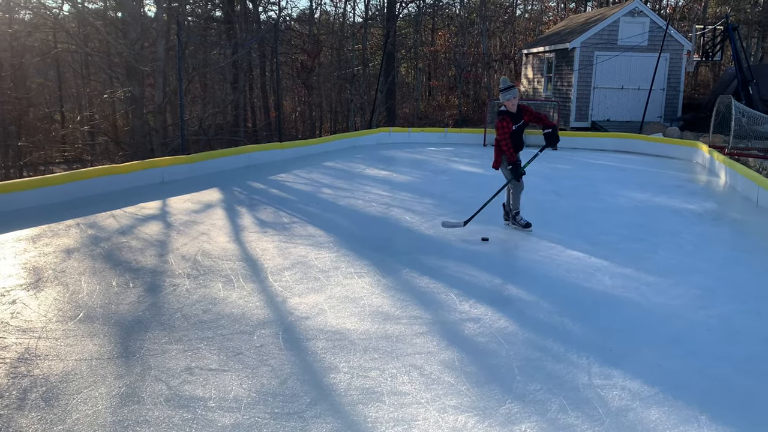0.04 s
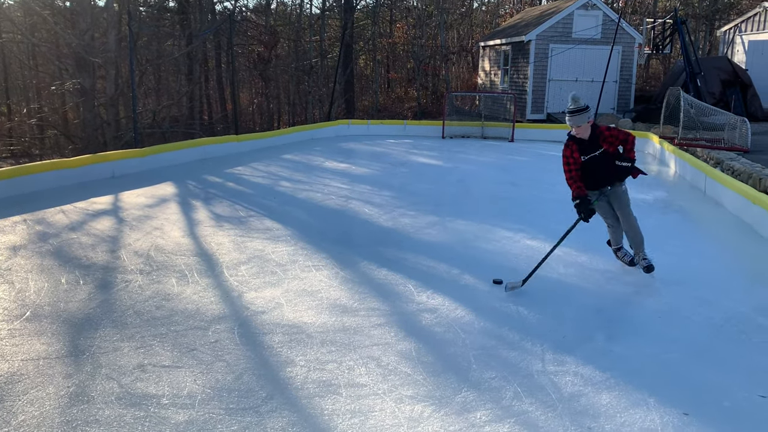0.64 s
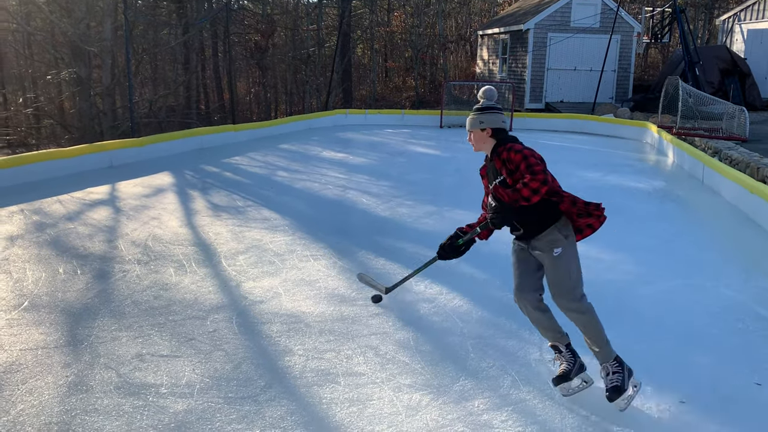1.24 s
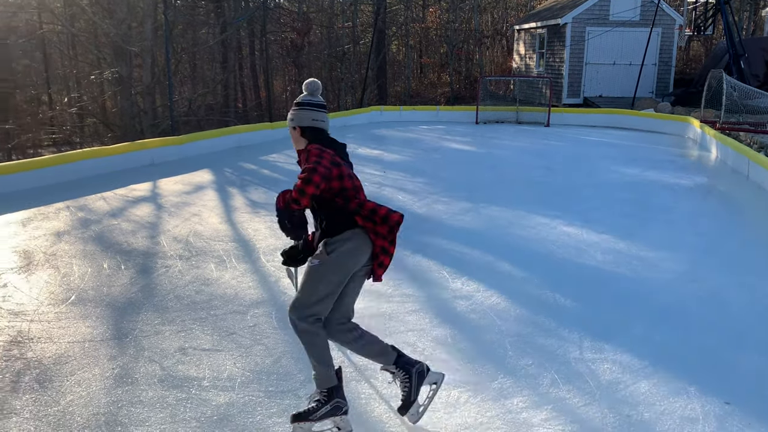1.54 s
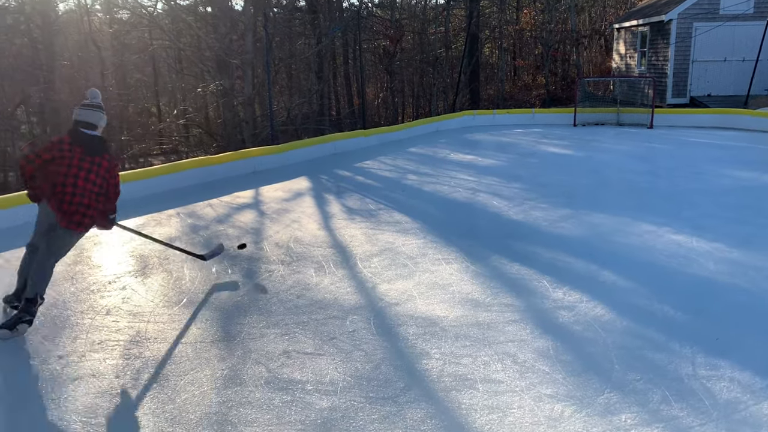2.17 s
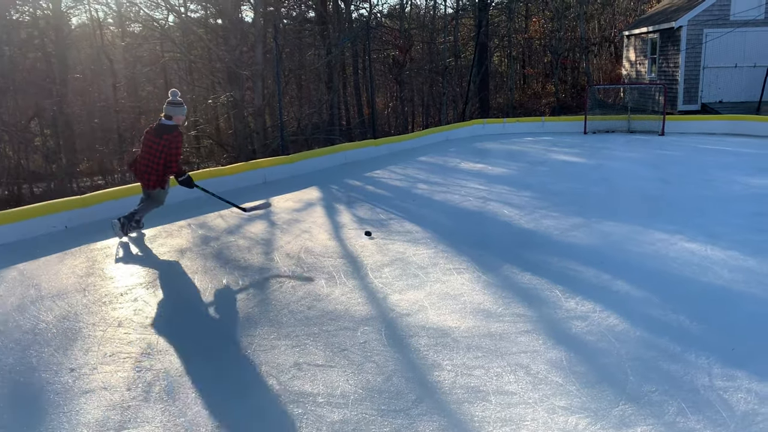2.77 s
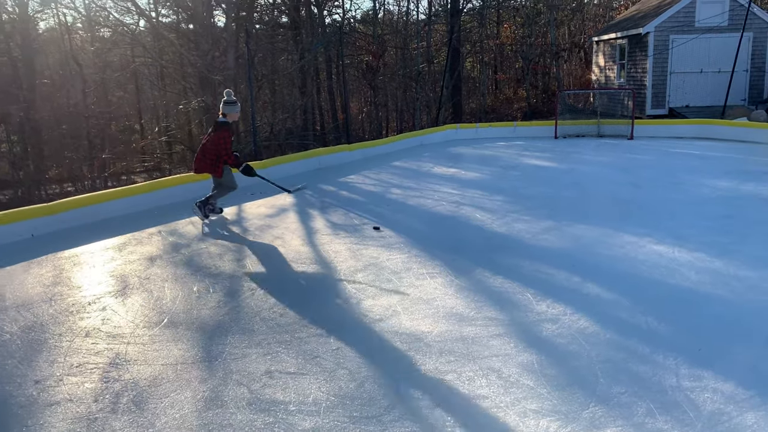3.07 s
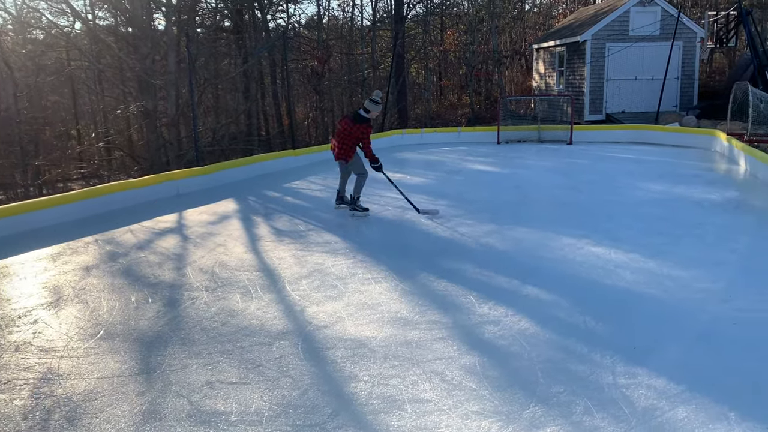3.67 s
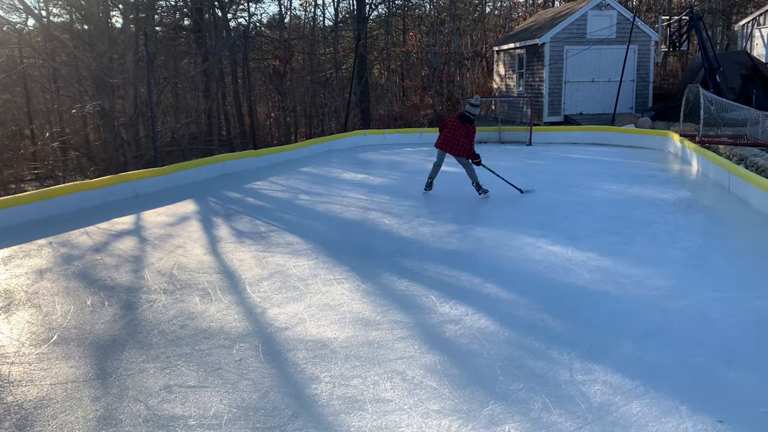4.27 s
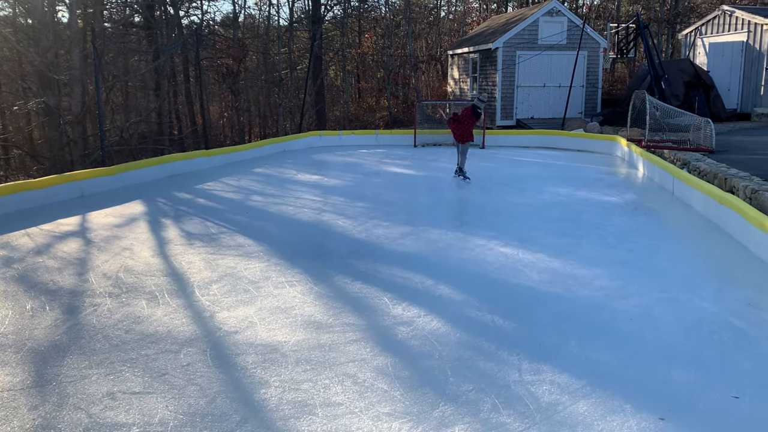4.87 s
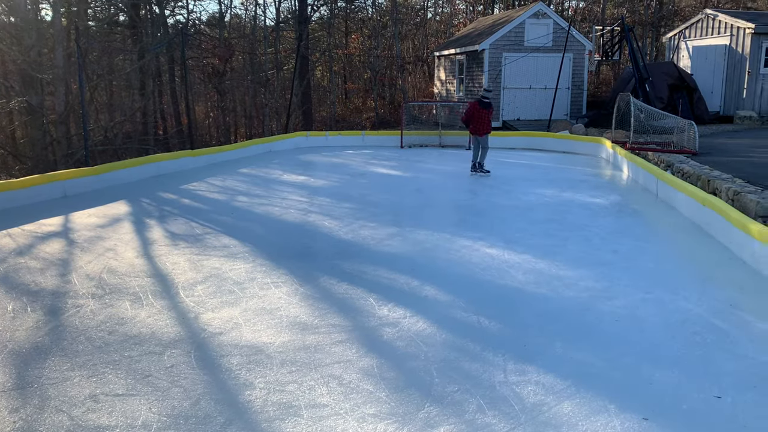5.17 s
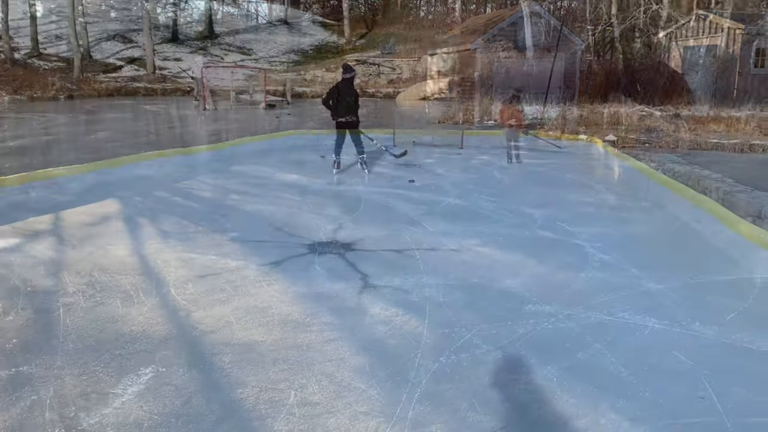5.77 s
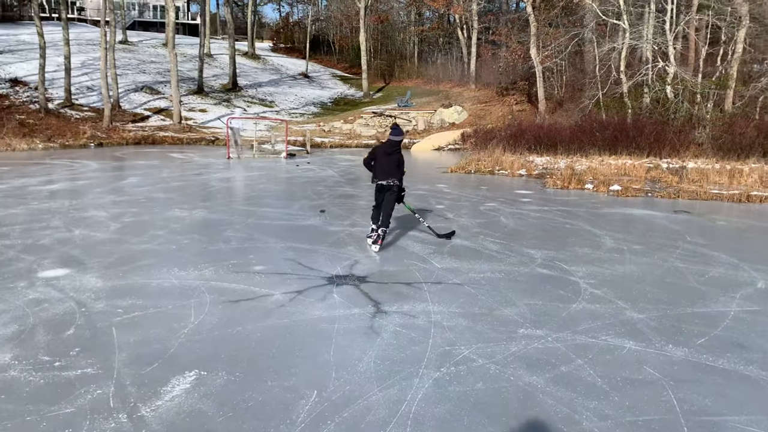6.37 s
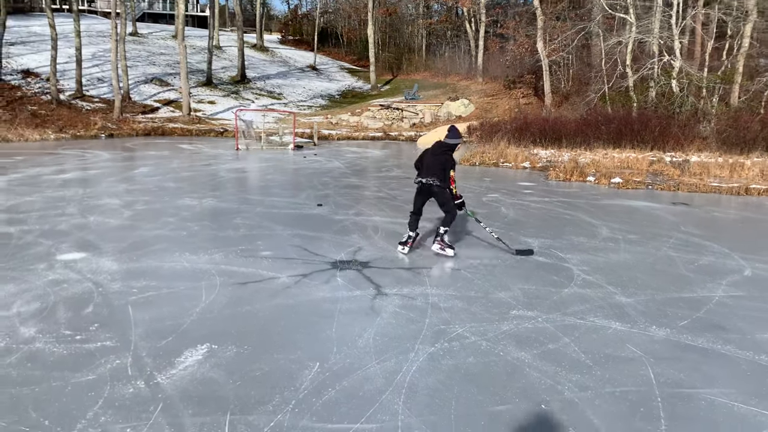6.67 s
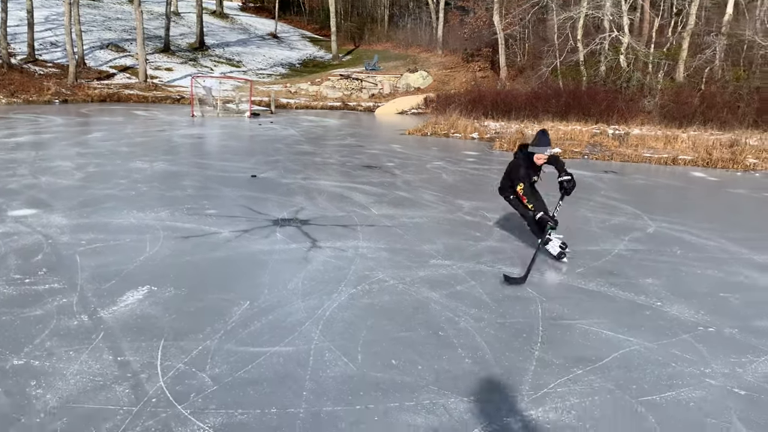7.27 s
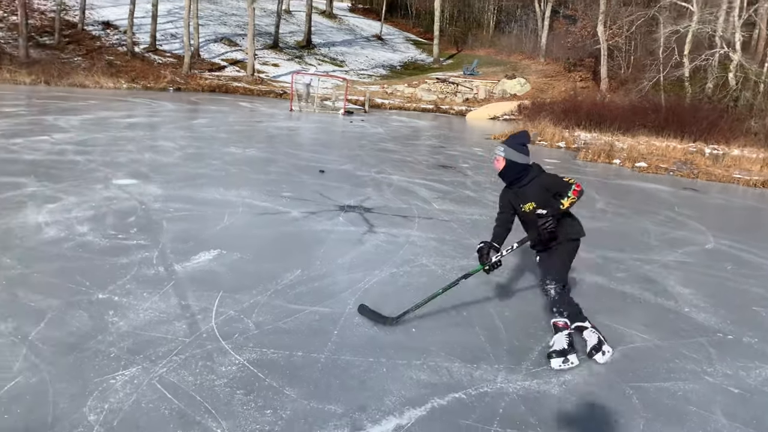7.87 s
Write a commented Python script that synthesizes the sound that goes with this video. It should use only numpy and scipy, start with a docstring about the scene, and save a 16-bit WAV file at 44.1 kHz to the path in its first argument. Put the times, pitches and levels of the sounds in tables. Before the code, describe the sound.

Ice skates scrape and carve outdoors while a hockey stick clacks on the puck and one shot booms off the boards.

```python
"""A stick clacks on puck and ice as a skater crosses a backyard rink, sweeps a shot and booms it off
the boards; then a skater glides on a frozen pond, whose ice chirps when knocked. Impacts excite the
damped modes of the stick blade and the boards. Sliding friction makes the steel edges grind and hiss
over rumbling ice. Boards and woods reflect the strikes back to a pair of small microphones."""
import sys
import numpy as np
from scipy import signal
from scipy.fft import rfft, irfft, next_fast_len
from scipy.io import wavfile

SR = 44100
rng = np.random.default_rng(int(sys.argv[2]) if len(sys.argv) > 2 else 0)


def put_to_file(sound):
    """Save the sound as 16-bit audio at rate SR, in the file named by the first command-line argument."""
    columns = np.atleast_2d(sound).T  # one column per channel
    safe = np.clip(columns, -1, 1)
    whole_steps = np.round(safe * 32767)
    wavfile.write(sys.argv[1], SR, whole_steps.astype(np.int16))


N = 354323
TIME = np.arange(N) / SR
FRICTION_ATTACK_S = 0.0044
# normal modes of the stick blade: f/Hz, level/dB
BLADE_MODES = [(520, -4), (670, -2), (840, -1.5), (1130, -2), (1300, 0.5), (1830, 1.5), (2160, -6.5),
               (2385, -3.5), (2880, -4.5), (3400, -3.5), (4100, 0)]
# spectrum of sprayed snow: f/Hz, level/dB
SNOW_SPECTRUM = [(1500, -6.5), (3900, -1.5), (5600, -6.5), (7400, -2.5), (8500, 1), (11500, -4.5),
                 (16000, -10.5)]


def clacks():
    """Impact excitation: each strike is three ever weaker contacts that rattle and ring the blade."""
    # stick, puck and skate strikes: t/s, knock level/dB, thump/dB re knock, crack/dB re knock,
    # favoured ring f/Hz
    strikes = [(0.23, -30, -13, -7, 1275), (0.257, -21.5, 0.5, -11, 509.2),
               (0.667, -17.5, -16.5, -17, 1330), (0.7245, -12, -8.5, -6.5, 1930),
               (1.117, -25, -2.5, -0.5, 1320), (1.135, -15.5, -4, -8.5, 1170), (1.38, -14, -8, -13, 1260),
               (1.39, -22.5, -4.5, -6, 1350), (1.81, -20.5, -1.5, -7, 680), (1.866, -30.5, -12, -1, 2340),
               (2.059, -15, -15.5, -5, 1550), (3.432, -23.5, -13.5, -6, 1460),
               (3.4917, -13, -7.5, -6.5, 1470), (4.04, -27.5, -12.5, -7, 1260),
               (4.083, -27, 3.5, -3.5, 485), (4.3167, -16, -17.5, -3.5, 2430), (4.765, -15.5, -1, -5, 1070),
               (5.153, -16.5, -0.5, 3, 1190), (5.161, -15.5, -10, -1, 1180), (6.414, -20, 6.5, -2.5, 664),
               (6.687, -30, -5, -9, 1090), (6.707, -24, -8.5, -5.5, 1590), (6.798, -33.5, 3.5, -1.5, 1570),
               (6.9126, -16.5, -7.5, -12, 1900), (6.919, -21.5, -4.5, -9, 1250),
               (6.971, -24.5, -0.5, -12.5, 706)]
    bounce_s, bounce_db, ring_db = 0.0023, -5, 1
    out, t = np.zeros((2, N)), np.arange(7000) / SR
    attack = t < 0.008
    for s, knock_db, thump_db, crack_db, ring_hz in strikes:
        chatter = amp(-22 + 6.4 * wander(per_s=386)[:len(t)]) * np.exp(-t / 0.015)
        contact = noise(len(t)) * (np.exp(-t / 0.00079) + chatter)
        lag = round(bounce_s * np.exp(0.15 * rng.standard_normal()) * SR)
        hit = 0
        for k in range(3):
            touch = unit(contact) + amp(ring_db) * unit(blade_ring(t, ring_hz, focus_db=10))
            hit = hit + amp(bounce_db * k) * np.roll(touch, k * lag, axis=1)
        # soft rubber gives the thump; the harder and nearer the crack, the more tick above it
        far = 3 < s < 4.5
        tick_db = 1.56 * crack_db - 10 * far
        parts = [(band(hit, 144, 702), thump_db), (band(hit, 1054, 2630), 0),
                 (band(hit, 2950, 6180), crack_db), (band(hit, 5500, 14200), tick_db)]
        clack = sum(amp(knock_db + db) * part / part[:, attack].std() for part, db in parts)
        add(out, s, clack)
        if 3 < s < 5:  # out on the rink, the boards slap it back
            add(out, s + 0.0165, amp(-10.5) * clack[::-1])
    return out


def blade_ring(t, ring_hz, focus_db, t60_s=0.018):
    """Free vibration: paired modes shift with the grip; the contact point favours those near ring_hz."""
    hz, db = np.transpose(BLADE_MODES + BLADE_MODES)[:, :, None]
    favoured = np.exp(-(np.log(hz / ring_hz) / 0.2) ** 2)
    hz = hz * (1 + 0.018 * rng.standard_normal(hz.shape))
    db = db + 3.5 * rng.standard_normal(hz.shape)
    envelopes = amp(db + focus_db * favoured - 60 * t / t60_s)
    return (envelopes * np.sin(2 * np.pi * (hz * t + rng.random(hz.shape)))).sum(0)


def shot_sweep(width_hz=450):
    """Friction drives a gliding resonance: the scraping blade's ring sinks as the shaft bends."""
    # the blade dragging the puck into the shot: t/s, level/dB, lowest ring f/Hz
    sweep = [(4.652, -48, 2800), (4.682, -24, 1650), (4.705, -27.5, 1140), (4.765, -28.5, 890),
             (4.85, -40.5, 830)]
    level_db, lowest_hz = controls(sweep)
    rub = scrape(chatter_db=3.0, chips_per_s=200, chip_db=2)
    # shift down by the ring frequency, low-pass, shift back: a moving band-pass
    carrier = np.exp(2j * np.pi * np.cumsum(lowest_hz) / SR)
    r = np.exp(-np.pi * width_hz / SR)
    sinking = (carrier * signal.lfilter([(1 - r) ** 2], [1, -2 * r, r * r], rub / carrier)).real
    modes = rubbed_blade(rub, lowest_hz, dull_db_per_octave=4.5)
    drag = amp(-5) * unit(sinking) + unit(modes) + amp(-6.5) * colour(rub, SNOW_SPECTRUM)
    return amp(level_db) * drag * (TIME > sweep[0][0]) * (TIME < sweep[-1][0])


def boards(impact_s=5.158):
    """Damped panel modes: the shot sets the boards booming, with a brief rattle."""
    # modes of the rink boards: f/Hz, level/dB, T60/s
    modes = [(135, -31, .25), (178, -29.5, 1.05), (229, -28.5, .3)]
    out, t = np.zeros((2, N)), np.arange(SR) / SR
    boom = sum(amp(db - 60 * t / t60) * np.sin(2 * np.pi * hz * t) for hz, db, t60 in modes)
    rattle = unit(band(noise(len(t)), 490, 4200, order=1)) * amp(-21 - 60 * t / 0.31)
    add(out, impact_s, (boom + rattle) * (1 - np.exp(-t / 0.0026)))
    return out


def ice_chirps(top_hz=2380, travel_s=0.0055, decay_s=0.0083):
    """Dispersion: short bending waves outrun long ones in ice, so a knock arrives as a falling chirp."""
    # knocks on the pond's ice sheet: t/s, level/dB
    knocks = [(6.799, -18), (6.814, -27), (6.901, -20), (7.213, -19)]
    out, t = np.zeros((2, N)), np.arange(SR // 10) / SR
    hz = top_hz / (1 + t / travel_s) ** 2
    chirp = np.sin(2 * np.pi * np.cumsum(hz) / SR) * (1 - hz / top_hz) * np.exp(-t / decay_s)
    for s, db in knocks:
        add(out, s, amp(db) * chirp[None])
    return out


def skates():
    """Sliding friction: runners grind, spray snow and rumble the ice; glide and strokes add in power."""
    # how hard and near the gliding skates bear on the ice: t/s, level/dB
    bearing = [(0.0, -52), (0.64, -48.5), (0.87, -39.5), (1.3, -39.5), (1.5, -35), (1.95, -45), (2.6, -42),
               (3.35, -48), (4.85, -48), (5.55, -51), (6.0, -53), (6.25, -43.5), (6.9, -51.5)]
    # spectrum of the rumbling ice sheet: f/Hz, level/dB
    rumble_spectrum = [(20, -34), (65, -5.5), (185, -1.5), (280, -3), (400, -20), (800, -35)]
    pond = np.clip((TIME - 5.5) / 0.5, 0, 1)  # 0 on the rink, 1 on the rougher natural ice
    bearing_db = controls(bearing)[0]
    glide_grind_db = bearing_db - 6 + 11 * pond
    glide_hiss_db = bearing_db - 16.5 + 10 * pond
    grind_power, carve_power, hiss_power = edge_work()
    grind_db = 10 * np.log10(grind_power + amp(glide_grind_db) ** 2)
    hiss_db = 10 * np.log10(hiss_power + amp(glide_hiss_db) ** 2)
    # a carving edge avoids nearly all of the rough ice's crunch
    rough_share = pond * np.clip(1 - 0.98 * carve_power / amp(grind_db) ** 2, 0, 1)
    grind = edge_grind(grind_db, rough_share, pond)
    spray = colour(scrape(chatter_db=3.8, chips_per_s=110, chip_db=7.5), SNOW_SPECTRUM)
    rumble = colour(noise(N) * amp(2.7 * wander(per_s=25)), rumble_spectrum)
    return amp(bearing_db) * rumble + amp(grind_db) * grind + amp(hiss_db) * through_air(spray)


def edge_work(sag_db_per_s=15.5, release_db_per_s=157, upright_drop_db=13):
    """Incoherent addition: pushes and carves sum to the powers of grind, its carving part and hiss."""
    # a skate set down and shoved sideways: t/s, length/s, grind level/dB, hiss/dB re grind
    pushes = [(0.227, 0.07, -37.5, 1.5), (1.48, 0.16, -37, -0.5), (1.759, 0.029, -35, 0),
              (3.436, 0.29, -40.5, -0.5), (3.737, 0.088, -39.5, 8), (4.028, 0.097, -40, -1),
              (4.308, 0.15, -39, 3.5), (4.552, 0.18, -48.5, 13), (6.138, 0.74, -36.5, -8.5),
              (6.387, 0.095, -41, 2)]
    # leans on an edge: deepest lean t/s, lean-in/s, lean-out/s, grind level/dB, hiss/dB re grind
    carves = [(0.87, 0.13, 0.36, -38.5, -11.5), (2.32, 0.45, 1, -40, -3.5), (2.92, 0.12, 0.25, -41, -18.5),
              (5.051, 0.43, 0.27, -42, 5), (7.51, 0.36, 0.13, -34, -16), (7.954, 0.098, 0.073, -28, -9)]
    when = TIME[::64]
    s, length_s, grind_db, push_snow_db = np.transpose(pushes)[:, :, None]
    t = np.maximum(when - s, 0)
    fall_db = sag_db_per_s * t + release_db_per_s * np.maximum(t - length_s, 0)
    push = np.minimum(t / FRICTION_ATTACK_S, 1) * amp(grind_db - fall_db)
    s, in_s, out_s, grind_db, carve_snow_db = np.transpose(carves)[:, :, None]
    upright = np.minimum(abs(when - s) / np.where(when < s, in_s, out_s), 10)
    carve = amp(grind_db - upright_drop_db * upright ** 2)
    grind = np.vstack([push, carve])
    snow = np.vstack([push * amp(push_snow_db), carve * amp(carve_snow_db)])
    return [np.interp(TIME, when, (strokes ** 2).sum(0)) for strokes in (grind, carve, snow)]


def edge_grind(grind_db, rough_share, pond):
    """Filtered friction noise: hollow on smooth ice, crunchy on rough, a hoarse ring if pressed hard."""
    # spectra of a steel edge on rink ice and on pond ice: f/Hz, level/dB
    rink_spectrum = [(220, -28.5), (420, -4.5), (700, -0.5), (1020, -6), (1330, -3), (2200, -7),
                     (3000, -17.5), (9000, -44.5)]
    pond_spectrum = [(200, -9.5), (380, 4.5), (640, -2.5), (860, -8), (1150, -1), (2800, -15),
                     (4400, -14.5), (8000, -85)]
    edge = scrape(chatter_db=2.6, chips_per_s=70, chip_db=6.5)
    delay_s = 0.00178 * np.exp(0.07 * wander(per_s=14) + 0.3 * pond)
    smooth = hollowed(colour(edge, rink_spectrum), delay_s, bounce_db=-4.5)
    rough = colour(edge * amp(2 * wander(per_s=110)), pond_spectrum)
    grind = np.sqrt(1 - rough_share) * smooth + np.sqrt(rough_share) * rough
    bite = 1 / (1 + np.exp(-(grind_db + 28) / 2))  # the ring takes half the power at -28 dB
    return np.sqrt(1 - bite) * grind + np.sqrt(bite) * unit(band(edge, 1410, 2270, order=2))


def scrape(chatter_db, chips_per_s, chip_db):
    """Friction noise: the edge chatters over bumps, crushes fine grains and snaps off small chips."""
    chips = (rng.random(N) < chips_per_s / SR) * rng.random(N)
    snaps = signal.lfilter([1], [1, -np.exp(-1 / (0.0008 * SR))], chips)
    grain_db = 2.5 * wander(per_s=500)
    return noise(N) * (amp(chatter_db * wander(per_s=60) + grain_db) + amp(chip_db) * snaps)


def blade_drags(release_s=0.037, sag_db_per_s=8):
    """Frictional excitation: the blade skims the ice, ringing unevenly and easing off as it goes."""
    # skims of the blade: t/s, length/s, level/dB, lowest ring f/Hz, dulling/(dB per octave)
    drags = [(0.786, 0.34, -44, 1320, 24), (2.169, 1, -45, 754, 21), (3.73, 0.081, -40, 1300, 15),
             (4.806, 0.17, -38, 850, 8.5), (4.95, 0.18, -42, 1150, 6)]
    out = np.zeros((2, N))
    rub = noise(N) * amp(3.5 * wander(per_s=52))
    for s, length_s, db, lowest_hz, dulling in drags:
        t = np.arange(round((length_s + release_s) * SR)) / SR
        gate = np.clip(np.minimum(t / FRICTION_ATTACK_S, (t[-1] - t) / release_s), 0, 1)
        ring = rubbed_blade(rub[:, round(s * SR):][:, :len(t)], lowest_hz, dulling)
        add(out, s, gate * amp(db - sag_db_per_s * t) * unit(ring))
    return out


def rubbed_blade(rub, lowest_hz, dull_db_per_octave, held_db_per_octave=27.5, width_hz=82):
    """Forced vibration: modes below the lowest ring are held back, those above fade by the octave."""
    out = 0
    for hz, db in BLADE_MODES:
        octaves = np.log2(hz / lowest_hz)
        dull_db = dull_db_per_octave * np.maximum(octaves, 0)
        held_db = held_db_per_octave * np.maximum(-octaves, 0)
        mode = signal.lfilter(*signal.iirpeak(hz, hz / width_hz, SR), rub)
        out = out + amp(db - dull_db - held_db) * mode
    return out


def crunches_and_taps(decay_s=0.011, band_ratio=1.28):
    """Contact noise: brief touches of stick or skate on the ice give gritty, fast-decaying bursts."""
    # short crunches, light stick taps and gritty skate scrapes: t/s, level/dB, centre f/Hz
    contacts = [(0.464, -39.5, 1490), (1.431, -37, 2000), (1.481, -29.5, 1670), (1.543, -27.5, 1480),
                (1.632, -37.5, 3400), (1.767, -30, 2970), (2.295, -36, 5400), (2.405, -38, 5400),
                (2.485, -39, 5400), (3.292, -46, 900), (3.637, -31.5, 2810), (3.823, -31, 590),
                (4.603, -33.5, 3340), (4.626, -32, 3170), (5.434, -36.5, 8300), (5.645, -41, 700),
                (6.078, -31, 1090), (6.17, -39.5, 1500), (6.222, -33.5, 700), (6.366, -32, 550),
                (6.385, -36.5, 1006), (7.52, -36, 1600), (7.654, -37, 1530), (7.717, -38, 1560),
                (7.885, -34, 1400)]
    out, t = np.zeros((2, N)), np.arange(SR // 10) / SR
    for s, db, hz in contacts:
        grit = noise(len(t)) * amp(4 * wander(per_s=500)[:len(t)]) * np.exp(-t / decay_s)
        burst = band(grit, hz / band_ratio, hz * band_ratio, order=1)
        add(out, s, amp(db) * unit(burst) * np.sqrt(decay_s / t[-1]))
    return out


def thuds():
    """Damped pressure transients: weight on the ice and puffs of air give low bursts of noise."""
    # thuds and puffs: t/s, level/dB, f/Hz, decay time/s
    bursts = [(1.141, -29.5, 154, 0.013), (1.431, -21, 168, 0.0063), (1.479, -44.5, 73.4, 0.53),
              (2.25, -42.5, 76, 0.25), (4.77, -33, 128, 0.028), (5.156, -25, 153, 0.054),
              (5.644, -32.5, 237, 0.02), (6.709, -32.5, 50, 0.023)]
    out, t = np.zeros((2, N)), np.arange(SR // 2) / SR
    for s, db, hz, decay_s in bursts:
        burst = band(noise(len(t)) * np.exp(-t / decay_s), hz / 1.36, hz * 1.41, order=2)
        add(out, s, amp(db) * unit(burst) * np.sqrt(decay_s / t[-1]))
    return out


def hollowed(x, delay_s, bounce_db):
    """Comb filtering: an inverted reflection with a changing path lays shifting peaks over the sound."""
    late = np.array([np.interp(TIME - delay_s, TIME, ear) for ear in x])
    return unit(x - amp(bounce_db) * late)


def through_air(x, db_per_m=1.1, from_hz=4100, full_hz=10000, neutral_m=5.6):
    """Treble attenuation with distance: the spray sparkles close by and turns dull far away."""
    # the skater's range from the microphones: t/s, distance/m
    distance = [(0.0, 16.7), (1.0, 0.73), (2.7, 7.5), (3.4, 13), (6.3, 11.6), (7.2, 1.9)]
    hz, when, spectra = signal.stft(x, SR, nperseg=256)
    treble = np.clip((hz - from_hz) / (full_hz - from_hz), 0, 1)
    loss_db = db_per_m * np.outer(treble, np.interp(when, *np.transpose(distance)) - neutral_m)
    return signal.istft(spectra * amp(-loss_db), SR, nperseg=256)[1][:, :N]


def placed(x, top_hz=6000):
    """Interaural time difference: all but the high treble reaches the ear nearer the skater first."""
    # the skater's direction: t/s, left ear lead/ms
    direction = [(1.1, -0.078), (1.7, 0.11), (3.0, 0.24), (3.7, -0.088), (6.2, -0.0086)]
    hz, when, spectra = signal.stft(x, SR, nperseg=256)
    lead_s = np.interp(when, *np.transpose(direction)) / 1000
    taper = np.clip(2 - 2 * hz / top_hz, 0, 1)
    advance = np.exp(1j * np.pi * np.outer(hz * taper, lead_s))
    return signal.istft(spectra * np.array([advance, advance.conj()]), SR, nperseg=256)[1][:, :N]


def echoes(x, near_db=-16.5, near_decay_s=0.014, woods_db=-22.5, woods_t60_s=1, taps_per_s=2500):
    """Reverberation: sparse early reflections from ice and boards, then a faint tail from the trees."""
    t = np.arange(SR) / SR
    taps = rng.choice([-1., 1.], (2, SR)) * (rng.random((2, SR)) < taps_per_s / SR) * (t > 0.003)
    taps = band(taps, 270, 3600, order=1)
    near = amp(near_db) * unit(taps * np.exp(-t / near_decay_s))
    woods = amp(woods_db) * unit(taps * amp(-60 * t / woods_t60_s))
    return signal.fftconvolve(x, (near + woods) / np.sqrt(SR), axes=1)[:, :N]


def noise(size):
    """Partial coherence: white noise at two ears, alike in bass and top treble, less so between."""
    # likeness of the ears: f/Hz, left-right correlation
    coherence = [(450, 0.97), (1500, 0.78), (5500, 0.048), (7500, 1)]
    length = next_fast_len(size, True)
    left, independent = rfft(rng.standard_normal((2, length)))
    same = np.clip(at_hz(coherence, np.fft.rfftfreq(length, 1 / SR)), -1, 1)
    right = same * left + np.sqrt(1 - same ** 2) * independent
    return irfft(np.array([left, right]), length)[:, :size]


def wander(per_s):
    """Random modulation of unit RMS, interpolated between per_s values a second."""
    knots = rng.standard_normal(int(TIME[-1] * per_s) + 2)
    return unit(np.interp(TIME * per_s, np.arange(len(knots)), knots))


def colour(x, spectrum):
    """Spectral shaping, to unit RMS."""
    size = next_fast_len(N, True)
    gain = amp(at_hz(spectrum, np.fft.rfftfreq(size, 1 / SR)))
    return unit(irfft(rfft(x, size) * gain, size)[:, :N])


def band(x, lo_hz, hi_hz, order=3):
    """Band-pass filtering."""
    return signal.sosfilt(signal.butter(order, [lo_hz, hi_hz], "band", fs=SR, output="sos"), x)


def at_hz(points, hz):
    """Interpolation along a log-frequency axis."""
    f, value = np.transpose(points)
    return np.interp(np.log(hz + 1), np.log(f), value)


def controls(rows):
    """Interpolation in time, one curve for each column."""
    s, *columns = np.transpose(rows)
    return [np.interp(TIME, s, c) for c in columns]


def add(mix, s, sound):
    """Superposition of a sound starting at s seconds."""
    part = mix[:, round(s * SR):][:, :sound.shape[1]]
    part += sound[:, :part.shape[1]]


def amp(db):
    """Level to amplitude ratio."""
    return 10 ** (np.asarray(db) / 20)


def unit(x):
    """Normalisation to unit RMS."""
    return x / np.sqrt(np.mean(x ** 2) + 1e-20)


def scene():
    """Superposition: the direct sound of strikes and skating, plus the echoes of the strikes."""
    strikes = clacks() + shot_sweep() + boards() + ice_chirps()
    direct = strikes + skates() + blade_drags() + crunches_and_taps() + thuds()
    return placed(direct) + echoes(strikes)


def record(dry):
    """Group delay and saturation: the microphones lag the left treble, round peaks and limit the band."""
    split_hz, lag_s, ceiling, cutoff_hz = 6000, 0.0002, 0.8, 16300
    size = next_fast_len(N + 1000, True)
    above_hz = np.maximum(np.fft.rfftfreq(size, 1 / SR) - split_hz, 0)
    left = irfft(rfft(dry[0], size) * np.exp(-2j * np.pi * above_hz * lag_s), size)[:N]
    rounded = ceiling * np.tanh(np.array([left, dry[1]]) / ceiling)
    low_pass = signal.firwin(255, cutoff_hz, window=("kaiser", 8), fs=SR)
    return signal.oaconvolve(rounded, low_pass[None], "same", axes=1)


dry = scene()
out = record(dry)
put_to_file(out)
```